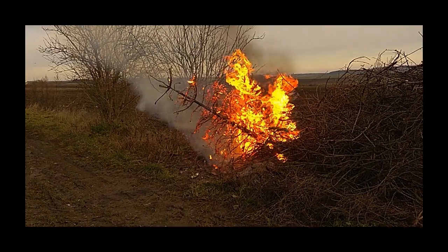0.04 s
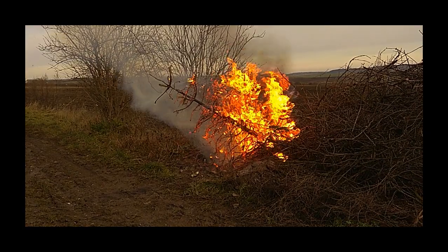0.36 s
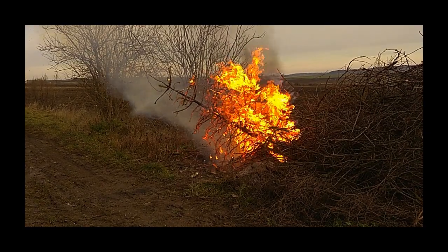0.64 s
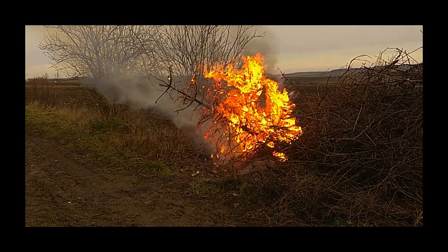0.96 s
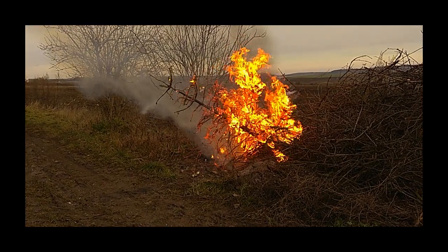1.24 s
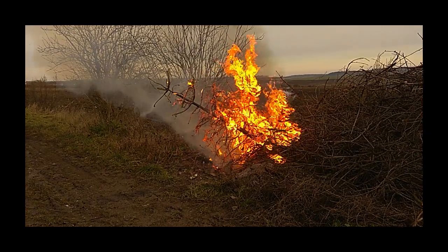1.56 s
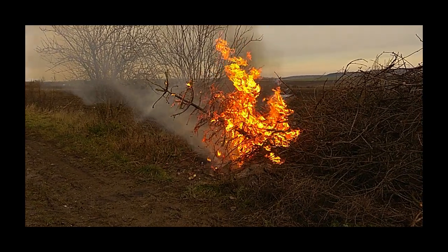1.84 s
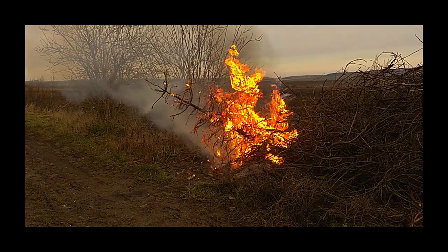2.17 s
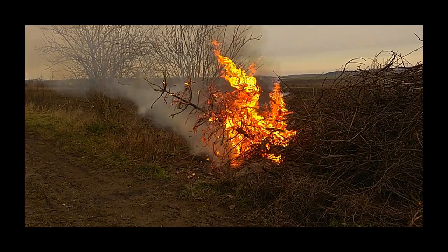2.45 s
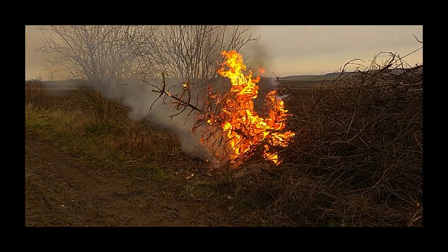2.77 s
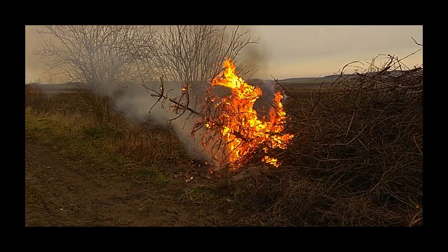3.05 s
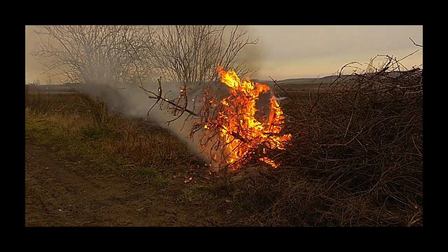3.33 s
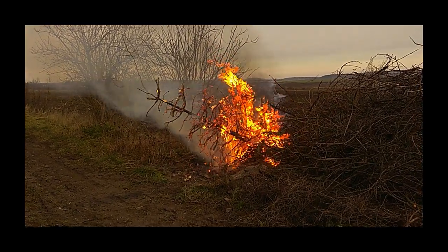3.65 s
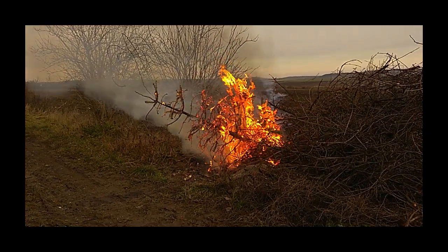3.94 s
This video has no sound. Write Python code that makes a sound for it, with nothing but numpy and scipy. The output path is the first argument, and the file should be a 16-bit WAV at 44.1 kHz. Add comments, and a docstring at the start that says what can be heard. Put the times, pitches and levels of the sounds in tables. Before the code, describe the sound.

A fire crackles and hisses through a dry conifer a few metres away, dense and bright at first, with sharp twig pops over a low flame rumble. It eases after 0.6 seconds, then flares briefly with a small hollow knock at 1.6. The crackle thins into softer, separate pops toward 4 seconds, while light, low wind buffets come between about 1.8 and 3.6 seconds.

```python
"""A dense, bright crackle of bursting needles over the hiss of escaping gas: a dry conifer burns in
an open field, a few metres away, and slowly dies down. Flames rumble low underneath.
Twigs pop, each a snap with a spray of splinters, and thicker ones give way with a hollow knock.
Brushwood and ground scatter every crack for a moment. Later, wind buffets and steam faintly whistles."""
import sys
import numpy as np
from scipy import signal
from scipy.fft import rfft, irfft, next_fast_len
from scipy.io import wavfile

SR = 44100
rng = np.random.default_rng(int(sys.argv[2]) if len(sys.argv) > 2 else 0)


def put_to_file(sound):
    """Save the sound as 16-bit audio at rate SR, in the file named by the first command-line argument."""
    columns = np.atleast_2d(sound).T  # one column per channel
    safe = np.clip(columns, -1, 1)
    whole_steps = np.round(safe * 32767)
    wavfile.write(sys.argv[1], SR, whole_steps.astype(np.int16))


N = 176400
TIME = np.arange(N) / SR
BAND_EDGES_HZ = np.linspace(np.sqrt(400), np.sqrt(16500), 15) ** 2
BAND_HZ = np.sqrt(BAND_EDGES_HZ[:-1] * BAND_EDGES_HZ[1:])
SIZZLE_FROM_HZ = 5540
WOODINESS = 1 / (1 + (BAND_HZ / SIZZLE_FROM_HZ) ** 6)   # by band: 1 is woody body, 0 is sizzle
CRACK_WINDOW_S = .002   # a crack packs the energy of its level held this long


def from_db(db):
    return 10 ** (np.asarray(db) / 20)


def rms_one(x):
    return x / np.sqrt(np.mean(x ** 2) + 1e-20)


def at_hz(points, hz):
    """Read a spectrum on a log-frequency axis."""
    known_hz, db = np.transpose(points)
    return np.interp(np.log(hz + 1), np.log(known_hz), db)


def band(x, low_hz, high_hz):
    """Band-pass."""
    return signal.sosfilt(signal.butter(2, [low_hz, high_hz], "band", fs=SR, output="sos"), x)


def coloured(x, *spectra):
    """Minimum-phase EQ with the given dB curves; white noise keeps its power."""
    size = 2 * next_fast_len(N)
    hz = np.arange(size // 2 + 1) * SR / size
    gain = rms_one(from_db(sum(at_hz(curve, hz) for curve in spectra)))
    cepstrum = irfft(np.log(gain))
    cepstrum[1:size // 2] *= 2
    cepstrum[size // 2 + 1:] = 0
    return irfft(rfft(x, size) * np.exp(rfft(cepstrum)))[..., :N]


def drift(hz):
    """A smooth random wobble, rms 1."""
    pole = np.exp(-2 * np.pi * hz / SR)
    return rms_one(signal.lfilter([1], [1, -2 * pole, pole * pole], rng.standard_normal(N + SR))[SR:])


def die_away(power, t60_s):
    """Spread each burst of energy over an exponential tail."""
    pole = 10 ** (-6 / (t60_s * SR))
    return signal.lfilter([1 - pole], [1, -pole], power + 1e-18)


def resonance(noise, hz, width_hz):
    """Noise through one resonance, rms 1."""
    return rms_one(band(noise, hz - width_hz / 2, hz + width_hz / 2))


def even_noise(white, low_hz, high_hz):
    """A noise band with a flat envelope, so that a pop's strength is set by its fracture."""
    analytic = signal.hilbert(band(white, low_hz, high_hz))
    return np.real(analytic) / np.abs(analytic) * np.sqrt(2 * (high_hz - low_hz) / (SR / 2))


def narrow_noise(alike=0.83, left_db=0.5):
    """Stereo noise, mostly common to both ears and a touch to the left."""
    noise = np.sqrt(alike) * rng.standard_normal(N) + np.sqrt(1 - alike) * rng.standard_normal((2, N))
    return from_db([[left_db / 2], [-left_db / 2]]) * noise


def swells(cues, half_width_s):
    """An envelope with one bell-shaped swell for each cue."""
    return sum(from_db(db) * np.exp(-((TIME - peak_s) / half_width_s) ** 2) for peak_s, db in cues)


# The vigour of the blaze, riding the crackle and the hiss: time_s, level_db
BLAZE = [(0, -21.5), (.57, -22.5), (1.47, -28.5), (1.59, -21.5), (1.74, -28), (2.37, -29.5), (3.24, -33.5),
         (3.33, -40), (3.42, -31.5), (3.6, -36), (3.69, -29), (4, -32)]

def needle_crackle(blaze_db, peak_per_s=300, mean_length_s=0.001):
    """Needles burst at random, fewer and weaker as the fire sinks; gives power by band."""
    thinning_db = .5 * (blaze_db - blaze_db.max())   # half the fall thins the bursts, half softens them
    at = np.flatnonzero(rng.random(N) < peak_per_s / SR * from_db(thinning_db) ** 2)
    accent_db = 2.5 * np.minimum(rng.exponential(1, len(at)), 0.7) - 1
    level_db = blaze_db[at] - thinning_db[at] + accent_db
    length_s = rng.exponential(mean_length_s, len(at))
    return fractures(TIME[at], level_db, length_s, body_db=rng.normal(-3.5, 4, len(at)))


def fractures(start_s, level_db, length_s, body_db, splinters_per_s=1000):
    """Each fracture is a quick run of splinters with a colour of its own; gives power by band."""
    power = np.zeros((len(BAND_HZ), N))
    band_share = from_db(at_hz(CRACKLE_EQ, BAND_HZ)) ** 2 * np.diff(BAND_EDGES_HZ)
    order = np.arange(12)
    trailing = order > 0   # only splinters after the first vary in timing and size
    for start, level, length, body in zip(start_s, from_db(level_db), length_s, body_db):
        delay_s = (order + rng.uniform(-.5, .5, len(order)) * trailing) / splinters_per_s
        splinter_db = rng.normal(0, 2, len(order)) * trailing + 0.5 * delay_s / max(length, 1 / SR)
        energy = from_db(splinter_db) ** 2 * (delay_s <= length)
        tint = from_db(rng.normal(0, 3.5, len(BAND_HZ))) ** 2
        colour = tint / np.average(tint, weights=band_share) * from_db(body * WOODINESS) ** 2
        at = np.clip(((start + delay_s) * SR).astype(int), 0, N - 1)
        power[:, at] += np.outer(colour, energy / energy.sum()) * level ** 2 * CRACK_WINDOW_S * SR
    return power


def gas_hiss(blaze_db, trim_db=-3, body_db=5):
    """Gas escapes in fluttering jets; gives power by band."""
    flutter_db = 4.5 * np.maximum(drift(hz=25.2), -1)
    return np.outer(from_db(body_db * WOODINESS), from_db(blaze_db + trim_db + flutter_db)) ** 2


# The dark tone of the flames: frequency_hz, gain_db
RUMBLE_EQ = [(25, -20.5), (65, -16), (100, -10.5), (145, 2), (245, 0), (400, -18.5), (750, -27.5),
             (1600, -34.5)]

def flame_rumble(start_db=-44.5, fade_db_per_s=1.25):
    """The low roar of the flames, flickering as it slowly fades."""
    level_db = start_db - fade_db_per_s * TIME + 1.5 * drift(hz=39)
    return from_db(level_db) * coloured(narrow_noise(), RUMBLE_EQ)


# Twigs breaking; body is the woody weight against the sizzle: start_s, level_db, length_s, body_db
TWIG_POPS = [(0.0315, -0.5, 0.0092, 1.5), (0.085, -2.5, 0.0054, 5.5), (0.1936, -6, 0.00092, 6.5),
             (0.3435, -7, 0.003, -22), (0.3598, -1.5, 0.0043, -5), (0.4085, -3.5, 0.0016, -0.5),
             (0.4566, -4, 0.0037, -4), (0.5351, -1, 0.0036, 3.5), (0.552, -3.5, 0.0037, -1),
             (0.651, -5, 0.0047, 3), (0.6719, -6, 0.0023, 2), (0.6838, -3.5, 0.01, -4),
             (0.7118, -4, 0.0034, -4), (0.731, -4, 0.0043, -0.5), (0.8646, -2.5, 0.0028, 0.5),
             (0.887, -4.5, 0.0013, -3), (0.9127, -6.5, 0.001, -9), (0.946, -6, 0.012, 2),
             (1.0477, -0.5, 0.011, -14), (1.057, -6.5, 0.0043, -6), (1.1802, -7.5, 0.001, 10),
             (1.241, -4, 0.001, 5), (1.409, -5, 0.0027, -7.5), (1.579, -5, 0.0016, -12.5),
             (1.6035, -6.5, 0.0014, 3.5), (1.64, -7, 0.0091, 1), (1.6965, -4.5, 0.0008, 1),
             (1.815, -8, 0.0023, -28), (1.8466, -4, 0.0046, -29), (1.926, -15.5, 0.0037, -18),
             (1.956, -3, 0.0015, 3.5), (1.9781, -20, 0.0032, -4), (2.073, -10, 0.0041, -7),
             (2.1087, -10.5, 0.0023, -3), (2.156, -10, 0.00071, -13), (2.173, -6.5, 0.0031, -10),
             (2.2997, -12, 0.00086, 8), (2.3135, -7, 0.0033, 2), (2.468, -12.5, 0.0018, 7.5),
             (2.5411, -3, 0.0019, 5.5), (2.565, -4.5, 0.0045, 3.5), (2.768, -13.5, 0.0034, -4),
             (2.7933, -13, 0.0019, -3.5), (2.8412, -10.5, 0.0034, -5), (2.856, -10, 0.00079, -2.5),
             (2.9153, -14, 0.0006, -4), (2.9235, -10, 0.0019, 5), (3.101, -11, 0.0005, 2),
             (3.1316, -9, 0.006, -7.5), (3.1719, -13, 0.0005, -4), (3.1943, -8.5, 0.0006, -18),
             (3.2795, -10.5, 0.0011, -1.5), (3.3619, -15, 0.0042, -1), (3.399, -12.5, 0.0035, -15),
             (3.4472, -10.5, 0.0049, 0), (3.5492, -11.5, 0.0027, -8), (3.6999, -15.5, 0.0005, 14),
             (3.7179, -10, 0.0039, 0.5), (3.742, -10.5, 0.0005, 1), (3.7815, -11, 0.0041, 5.5),
             (3.8034, -5, 0.0023, 1.5), (3.977, -15, 0.0008, -8), (3.991, -10.5, 0.0011, -1)]

def twig_pops(trim_db=-1.84):
    """Twigs splinter in loud single pops; gives power by band."""
    start_s, level_db, length_s, body_db = np.transpose(TWIG_POPS)
    return fractures(start_s, level_db + trim_db, length_s, body_db)


def twig_snaps(trim_db=-9, extra_body_db=6, thin_below_hz=2000, ear_lag_s=.00015):
    """The instant a twig breaks: one pressure pulse, earlier in one ear; gives clicks by band and ear."""
    clicks = np.zeros((len(BAND_HZ), 2, N))
    low_cut = np.minimum(BAND_HZ / thin_below_hz, 1) ** 2
    polarity = (-1) ** np.arange(len(BAND_HZ))
    for start_s, level_db, _, body_db in TWIG_POPS:
        colour = from_db((body_db + extra_body_db) * WOODINESS - max(body_db, 0) / 2)
        pulse = colour * low_cut * polarity * from_db(level_db + trim_db) * np.sqrt(CRACK_WINDOW_S * SR)
        lag_s = rng.uniform(-ear_lag_s, ear_lag_s)
        for ear, arrival_s in enumerate((start_s, start_s + lag_s)):
            clicks[:, ear, min(int(arrival_s * SR), N - 1)] += pulse
    return clicks


def brushwood_scatter(pop_power, needle_power):
    """Brushwood and ground throw back a short tail, strong on the needles and light on the twigs."""
    send = from_db(-13) ** 2 * pop_power + from_db(2.5) ** 2 * needle_power
    return die_away(send, t60_s=0.041)


def throatiness(hz, blaze_db, throat_hz=1290):
    """Power gain of a band: the throaty low end swings more with the blaze, the lower sizzle less."""
    throat = np.exp(-(2 * np.log2(hz / throat_hz)) ** 2)
    sizzle = np.exp(-(2 * np.log2(hz / SIZZLE_FROM_HZ)) ** 2)
    return from_db((throat - 0.16 * sizzle) * (blaze_db - blaze_db.mean())) ** 2


# The bright tone of all cracks and the hiss: frequency_hz, gain_db
CRACKLE_EQ = [(450, -43.5), (800, -43.5), (1300, -38), (1810, -21.5), (2390, -20), (2950, -24.5),
              (3700, -18.5), (4900, -8), (6600, -10.5), (7600, -9), (8600, -2.5), (10400, 3), (12400, 3),
              (15500, -3.5)]
# The stereo lean of the fire: frequency_hz, left_over_right_db
FIRE_PAN = [(1300, 14), (2400, 5), (5500, 9), (7000, 2), (8200, 11), (10500, 3.5), (12200, 14),
            (13500, 17.5), (15200, 1)]

def fire(alike_below_hz=2300, ring_cycles=7):
    """Needles, gas and twigs sound as bands of noise, narrow in the lows and wide in the highs."""
    blaze_db = np.interp(TIME, *np.transpose(BLAZE))
    needles, gas, pops, snaps = needle_crackle(blaze_db), gas_hiss(blaze_db), twig_pops(), twig_snaps()
    shared, per_ear = rng.standard_normal((2, 1, N)), rng.standard_normal((2, 2, N))
    mix = np.zeros((2, N))
    for k, hz in enumerate(BAND_HZ):
        edges_hz = BAND_EDGES_HZ[k:k + 2]
        ring_s = .0013 + ring_cycles / hz   # lower bands ring longer
        throaty = throatiness(hz, blaze_db)
        pop_power = die_away(pops[k], ring_s)
        needle_power = die_away(throaty * needles[k], ring_s)
        bed_power = throaty * gas[k] + needle_power + brushwood_scatter(pop_power, needle_power)
        alike = 1 / (1 + (hz / alike_below_hz) ** 4)
        noise = np.sqrt(alike) * shared + np.sqrt(1 - alike) * per_ear
        bed = np.sqrt(bed_power) * noise[k % 2]   # neighbouring bands get unrelated noise
        splinters = np.sqrt(pop_power) * even_noise(noise[1 - k % 2], *edges_hz)
        mix += band(bed + snaps[k] + splinters, *edges_hz)
    left_db = 1 + 0.31 * TIME   # the fire leans more and more to the left
    return np.array([from_db(left_db * side) * coloured(ear, CRACKLE_EQ, np.array(FIRE_PAN) * [1, side])
                     for ear, side in zip(mix, (.5, -.5))])


# Thicker twigs giving way: start_s, level_db
TWIG_KNOCKS = [(0.536, -50.5), (0.867, -56), (1.599, -42.5), (1.627, -51.5)]

def twig_knocks(t60_s=0.13):
    """A thicker twig breaks with a short, hollow ring."""
    envelope = sum(from_db(level_db - 60 * np.abs(TIME - start_s) / t60_s) * (TIME >= start_s)
                   for start_s, level_db in TWIG_KNOCKS)
    return envelope * resonance(rng.standard_normal(N), hz=1220, width_hz=560)


# Buffets of wind: peak_s, level_db
WIND_GUSTS = [(1.84, -47), (2.42, -50), (2.9, -43.5), (3.33, -44), (3.58, -47.5)]

def wind_gusts():
    """Wind buffets in short, low swells."""
    return swells(WIND_GUSTS, half_width_s=0.055) * resonance(narrow_noise(), hz=153, width_hz=95)


# Faint, breathy whistles of steam: peak_s, level_db
STEAM_WHISTLES = [(3.82, -59), (3.93, -62)]

def steam_whistles():
    """Steam sings briefly in the wood."""
    breath = resonance(rng.standard_normal(N), hz=1090, width_hz=190)
    return swells(STEAM_WHISTLES, half_width_s=0.047) * breath


def scene():
    """The crackling fire up front, with rumble, knocks, wind and steam underneath."""
    return fire() + flame_rumble() + twig_knocks() + wind_gusts() + steam_whistles()


def record(dry, ceiling=.9, cutoff_hz=15800):
    """Soft-clip the highest peaks, then cut the top with a steep low-pass."""
    rounded = dry / (1 + (dry / ceiling) ** 6) ** (1 / 6)
    return signal.sosfilt(signal.ellip(10, .2, 70, cutoff_hz, fs=SR, output="sos"), rounded)


dry = scene()
out = record(dry)
put_to_file(out)
```